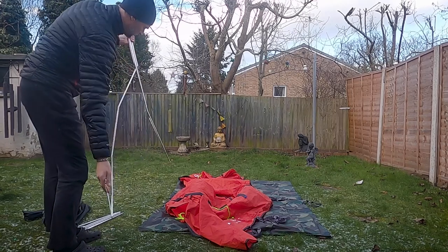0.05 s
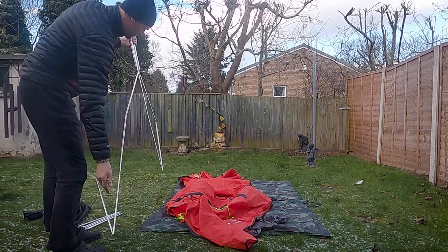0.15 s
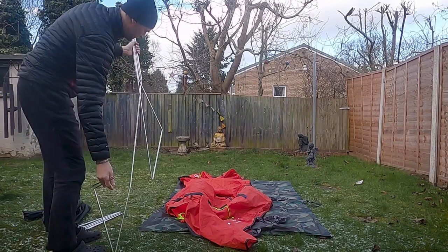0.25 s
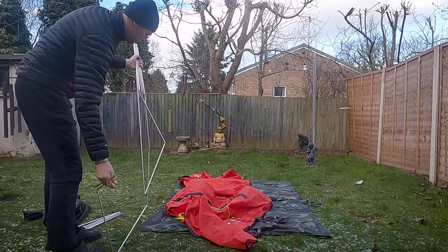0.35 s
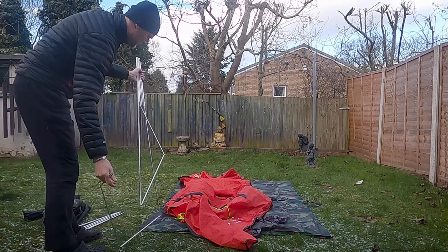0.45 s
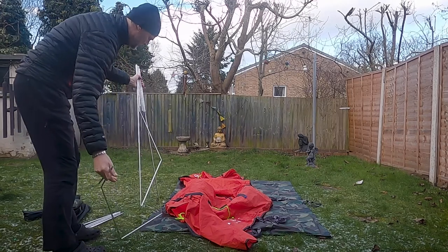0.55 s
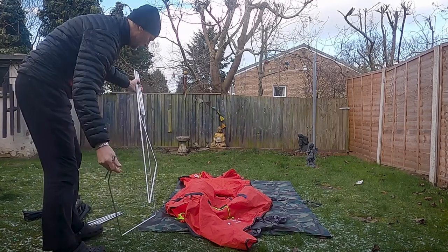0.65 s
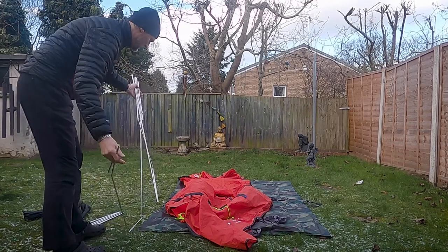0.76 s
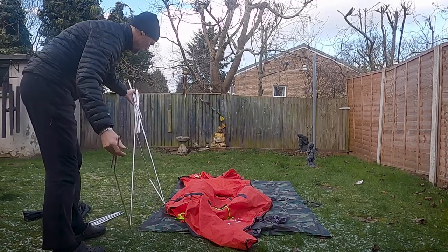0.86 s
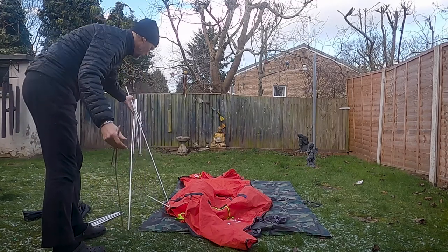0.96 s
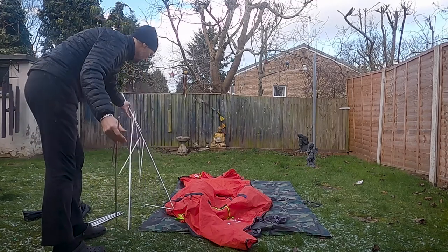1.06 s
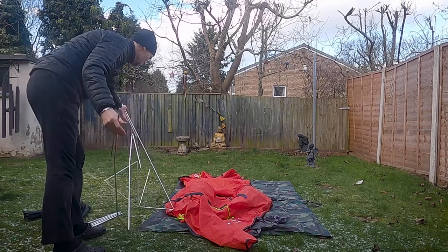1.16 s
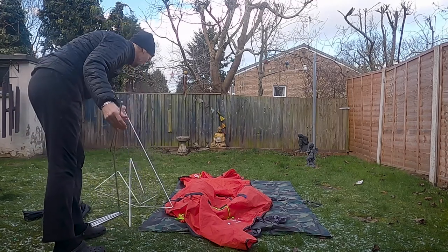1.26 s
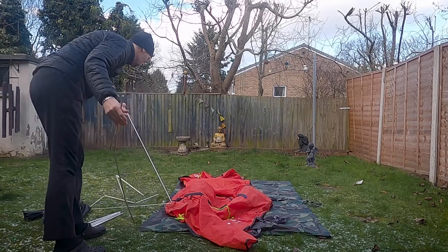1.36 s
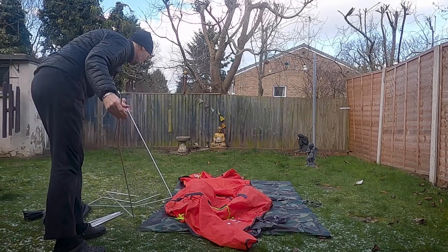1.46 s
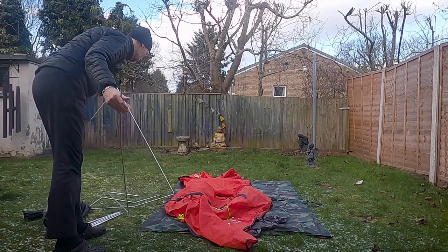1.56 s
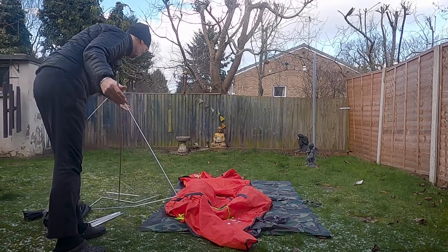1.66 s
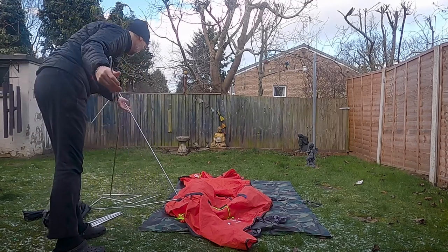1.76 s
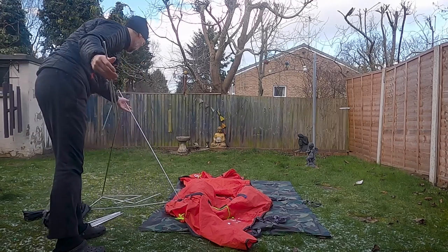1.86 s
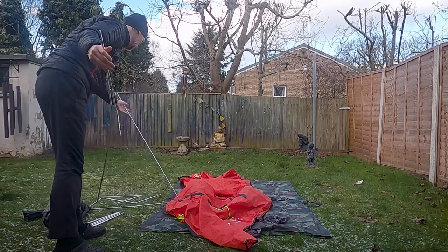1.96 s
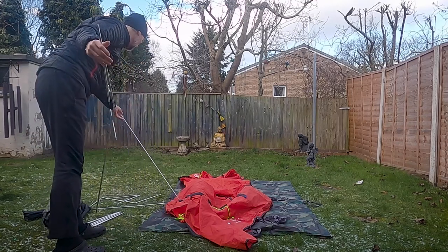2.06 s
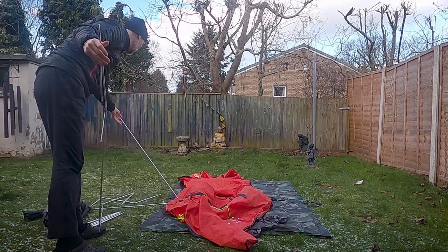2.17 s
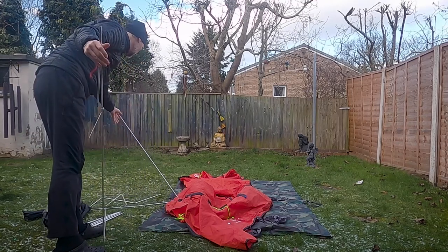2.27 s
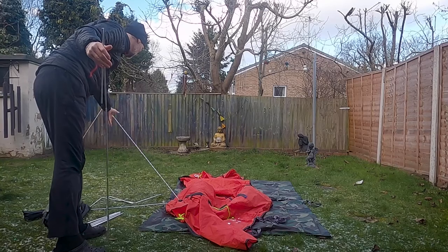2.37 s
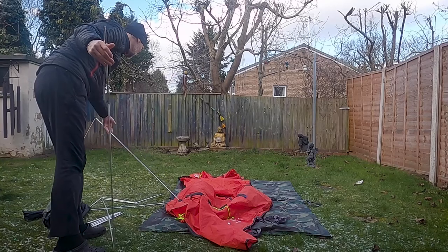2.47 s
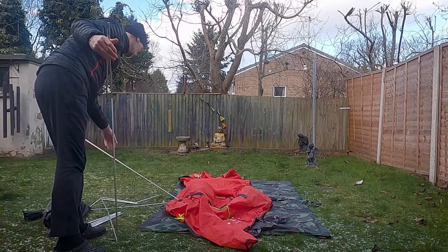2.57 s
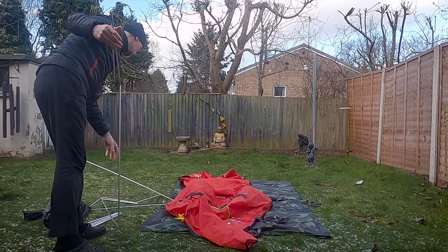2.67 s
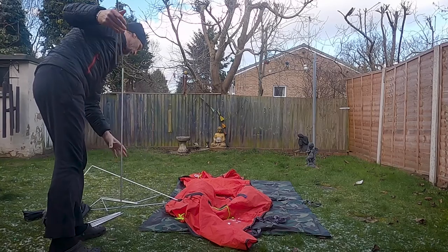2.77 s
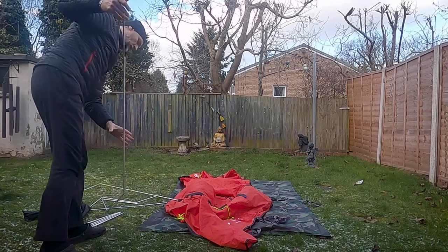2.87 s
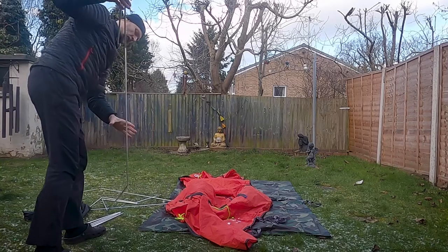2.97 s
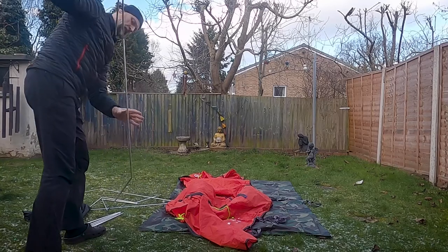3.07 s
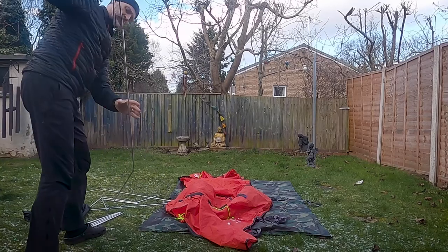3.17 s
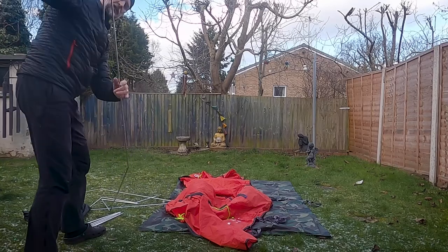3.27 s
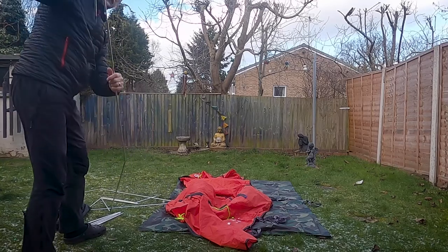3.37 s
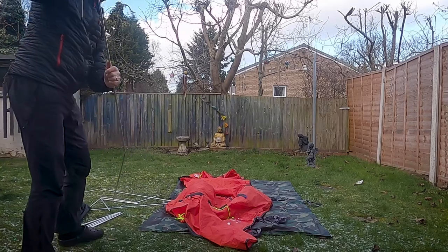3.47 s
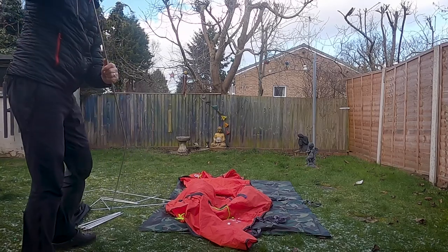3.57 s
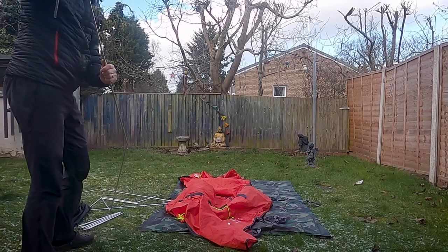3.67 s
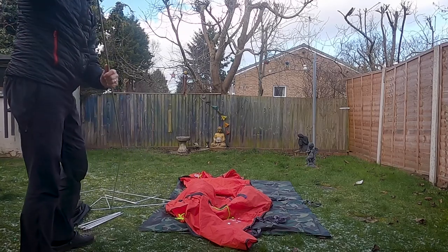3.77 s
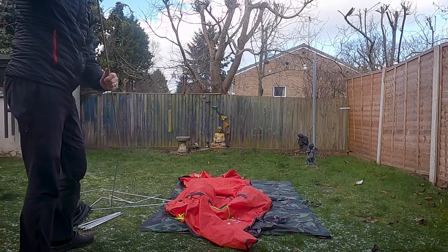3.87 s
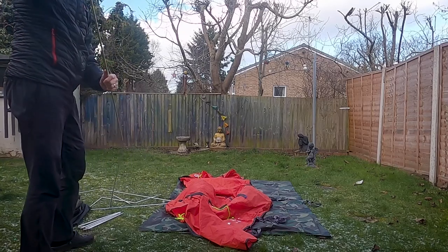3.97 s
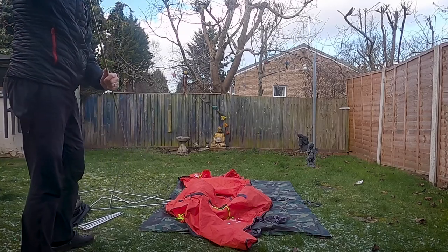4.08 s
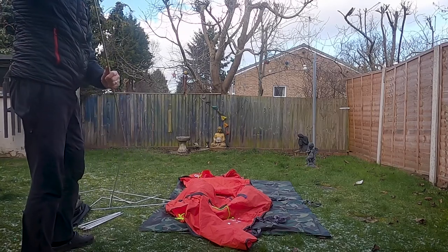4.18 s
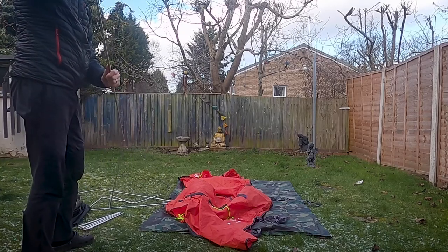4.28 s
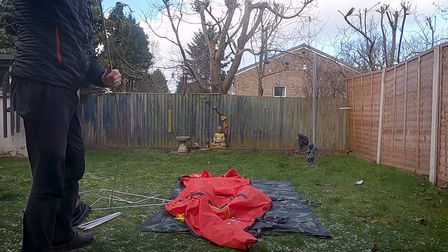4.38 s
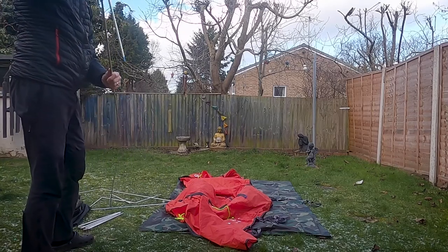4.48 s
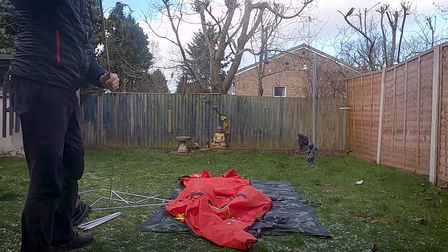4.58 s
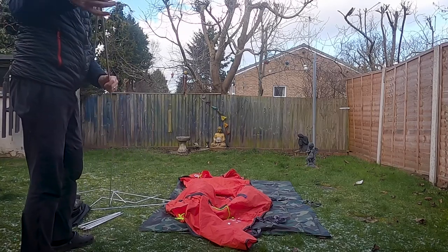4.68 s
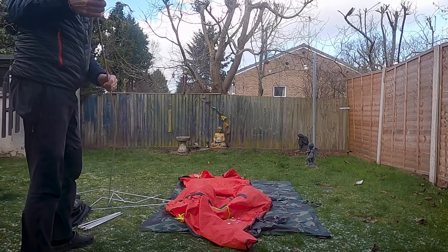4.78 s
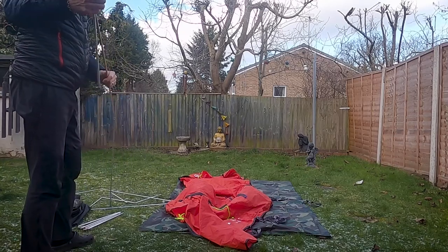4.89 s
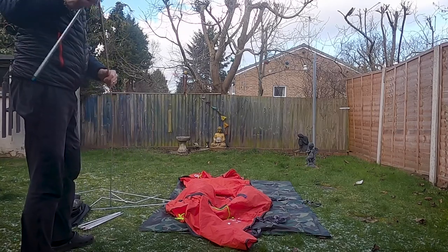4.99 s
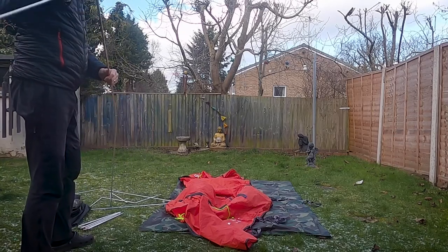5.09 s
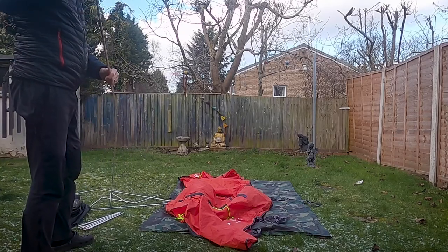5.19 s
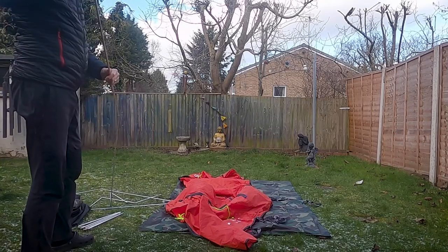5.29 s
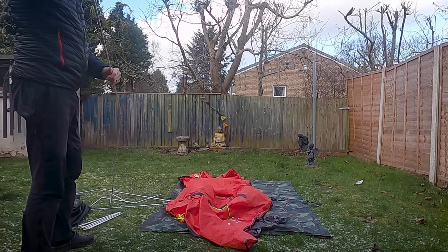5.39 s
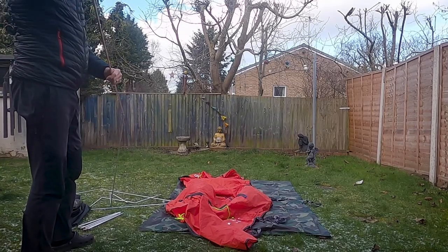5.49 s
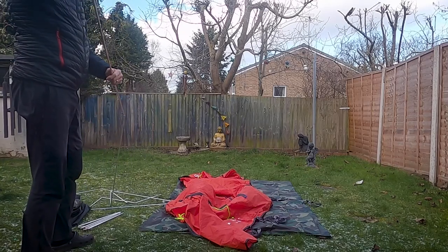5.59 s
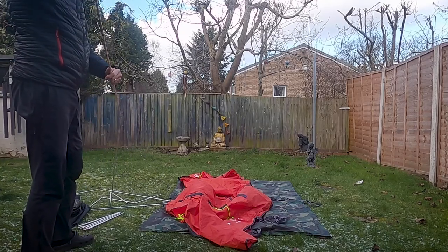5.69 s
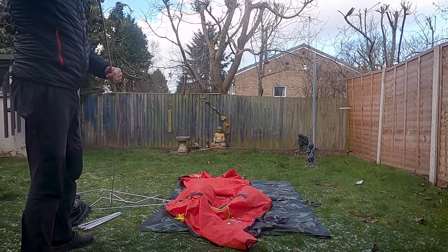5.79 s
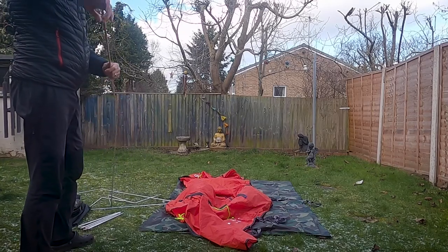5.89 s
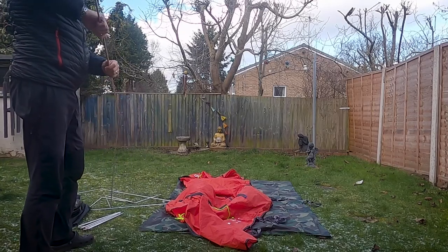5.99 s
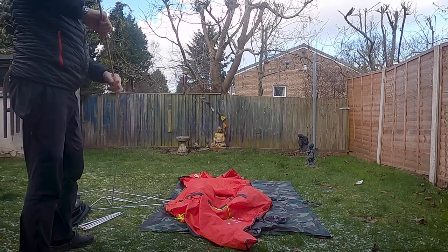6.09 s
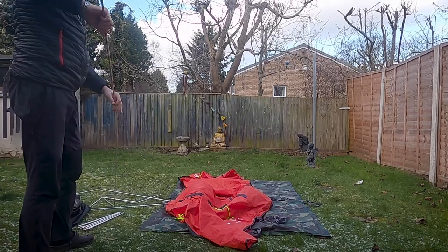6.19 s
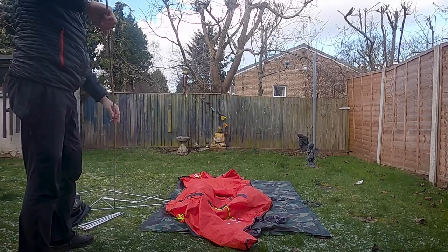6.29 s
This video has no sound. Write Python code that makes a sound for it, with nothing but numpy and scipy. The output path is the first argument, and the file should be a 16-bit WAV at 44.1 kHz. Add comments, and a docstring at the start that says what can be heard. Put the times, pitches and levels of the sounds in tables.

```python
"""In a quiet, fenced garden, a folded aluminium tent pole is shaken out on the lawn.
Its sections clack, slide and rattle: impacts and friction excite the resonances of a tube.
The elastic cord draws the ferrules home with a scrape and a snap; rough narrow tones sing between.
A nylon jacket swishes with every reach as dense coloured grains over dull flapping noise.
Boots and pole ends thud on the turf as decaying booms and noise with a crunch of grass."""
import sys
import numpy as np
from scipy import signal
from scipy.fft import rfft, irfft
from scipy.io import wavfile
from scipy.ndimage import uniform_filter1d

SR = 44100
rng = np.random.default_rng(int(sys.argv[2]) if len(sys.argv) > 2 else 0)


def wav_record(signal):
    """Record a signal, one row per channel, as 16-bit PCM in the file named by sys.argv[1]."""
    frames = np.transpose(np.atleast_2d(signal))
    bounded = np.clip(frames, -1, 1)
    # unit amplitude maps onto the largest positive 16-bit level
    quanta = np.round(bounded * 32767).astype(np.int16)
    wavfile.write(sys.argv[1], SR, quanta)


N = 279814
TIME = np.arange(N) / SR

# Still air of the garden, relative spectrum: frequency_hz, density_db_per_hz
AIR_SPECTRUM = [(18, -49), (30, -20.5), (68, 0.5), (138, -2), (259, -11.5), (512, -9.5), (962, -12.5),
                (2610, -15), (11100, -27), (12600, -40.5), (16000, -47)]
# House wall and fences: delay_s, level_db (relative to the low-passed direct sound)
WALL_ECHOES = [(.0075, -20.5), (.019, -23), (.033, -24.5), (.058, -34.5)]
# Arm movements: start_s, attack_s, end_s, swish_db (relative),
# hiss_db and flap_db (both relative to swish_db)
ARM_STROKES = [(-0.1, .08, 0.0, -56, -4, -4), (0.225, .11, 0.35, -46, -4, -6),
               (0.48, .07, 0.598, -48, -19, -7), (0.569, .08, 0.82, -39, -14, -12.5),
               (0.78, .08, 1.1, -38, -12, -7), (1.09, .08, 1.46, -42, -13, 0),
               (1.443, .05, 1.62, -49, -11, -10), (1.59, .06, 2.03, -43, -9, -8),
               (2.0, .07, 2.24, -43, -10, -16), (2.22, .04, 2.49, -42, -7, -8),
               (2.5, .08, 2.8, -58, -4, -10), (2.64, .07, 2.74, -46, -7, -7),
               (2.78, .15, 3.0, -52, -11, -13), (2.97, .04, 3.03, -57, -15, -5),
               (3.06, .1, 3.2, -63, -19, -10), (3.17, .1, 3.3, -44.5, -16, -12),
               (3.29, .06, 3.42, -51.5, -19, -10), (3.4, .08, 3.56, -47.5, -11, -8),
               (3.596, .08, 3.71, -59, -6.5, -4), (3.733, .08, 4.062, -68.5, -8, -2),
               (3.87, .06, 3.96, -57, -7, -2), (4.13, .07, 4.86, -77.5, -9, -1),
               (4.44, .06, 4.52, -68, -13, -5), (4.6, .07, 4.678, -75, -9, 0),
               (4.97, .07, 5.11, -74, -8, 9), (5.32, .06, 5.46, -81, -6.5, 4),
               (5.65, .06, 5.71, -64, -4, 3), (5.88, .11, 6.0, -53.5, -14, -8),
               (6.005, .07, 6.07, -37.5, -9.5, -9), (6.061, .08, 6.254, -42.5, -7, -6),
               (6.21, .11, 6.34, -36, -5, -7)]
# Relative spectra of the cloth: frequency_hz, density_db_per_hz
SWISH_SPECTRUM = [(250, -16), (350, -12), (460, -4), (620, -6.5), (820, -7), (1200, -5), (1700, 0.5),
                  (2200, -.5), (2800, -7), (4300, -15), (6000, -23), (10000, -38.5), (16000, -53.5)]
HISS_SPECTRUM = [(1500, -13), (3000, 1), (5000, 2), (6200, -3.5), (8600, -1.5), (11000, -8), (13000, -18),
                 (16000, -25.5)]
FLAP_SPECTRUM = [(25, -32), (55, -30.5), (90, -6), (130, -2.5), (180, -3.5), (300, -10), (600, -11.5),
                 (2000, -42)]
# Boots and pole ends land on the turf: start_s, thud_db (relative), crunch_db (relative), t60_s, boom_hz
TURF_THUDS = [(0.289, -43, -69, 0.3, 85), (0.64, -41, -56, 0.18, 149), (1.176, -45, -39, 0.5, 155),
              (1.311, -35, -23.5, .07, 263), (1.412, -36, -48, 0.24, 88), (1.967, -42, -39.5, .12, 169),
              (2.25, -47.5, -39, 0.14, 527), (2.704, -31, -22.5, 0.08, 145),
              (2.766, -38.5, -39, 0.052, 302), (2.817, -42.5, -42, 0.038, 247), (2.96, -36, -24, 0.04, 269),
              (2.9636, -22.5, -24, 0.06, 220), (3.249, -44, -68, 0.53, 162.7), (3.51, -43, -62, 0.2, 156),
              (3.554, -30.5, -48, 0.099, 118), (4.025, -51, -63, 0.29, 80.6), (5.069, -53, -66, 0.08, 125),
              (5.376, -53, -68, 0.14, 75)]
# Relative spectra of earth and crushed grass: frequency_hz, density_db_per_hz
EARTH_SPECTRUM = [(25, -28.5), (60, -19.5), (100, 6.5), (170, 9), (260, -7.5), (400, -18.5), (800, -16.5),
                  (2000, -47.5)]
GRASS_SPECTRUM = [(150, -4.5), (400, -1), (1100, -3), (2000, -5), (3200, -10), (5000, -21), (9000, -22.5),
                  (16000, -45)]
# Resonances of a pole section: frequency_hz, width_hz, level_db (relative)
TUBE_MODES = [(2270, 260, 0), (2644, 210, 4), (3250, 510, 0), (3940, 360, 0), (4450, 320, 0.5),
              (5130, 480, 1), (5850, 1400, -3), (7000, 1300, -0.5), (8675, 1100, -2.5), (9270, 980, -3),
              (10350, 2000, -5.5), (11700, 1200, -12), (15100, 700, -22)]
# Narrow tones, steady from the ringing pole or gliding from rubbed cord or cloth:
# start_s, end_s, first_hz, last_hz, level_db (relative)
SINGING_TONES = [(0.565, 0.758, 1265, 1275, -44.5), (0.592, 0.647, 3220, 3020, -37),
                 (.6, 0.82, 2300, 1980, -41), (0.922, 1.115, 1900, 1600, -40.5),
                 (1.13, 1.243, 1980, 1660, -41), (1.244, 1.465, 1264, 1264, -48),
                 (1.54, 1.66, 1474, 1434, -50), (2.044, 2.137, 1290, 1335, -41),
                 (2.079, 2.24, 1760, 1690, -47), (2.231, 2.448, 1850, 1502, -41),
                 (2.301, 2.437, 2150, 1850, -44.5), (4.46, 4.56, 1748, 1750, -67)]
# Tube slides along tube: start_s, end_s, level_db (relative), brightness_db_per_octave, ring_hz
TUBE_SLIDES = [(0.266, 0.292, -30, -9, 2550), (0.297, 0.32, -33, -8, 2770), (0.326, 0.358, -29.5, -6, 2700),
               (0.605, 0.681, -33.5, 5, 3150), (0.811, 0.886, -38.5, -7, 2300),
               (0.896, 0.962, -38, 1, 2240), (1.059, 1.104, -35.5, 5.5, 3080),
               (1.192, 1.248, -32.5, 3.5, 3530), (1.647, 1.694, -35.5, 1, 3500),
               (1.806, 1.898, -40, 0, 7960), (1.967, 2.019, -34, 0, 8950), (2.052, 2.19, -41.5, -3, 2180),
               (2.252, 2.34, -40.5, 3, 8400), (2.335, 2.5, -38.5, 0, 8400), (3.432, 3.49, -46, 0, 6340),
               (3.489, 3.523, -40, 2, 8400), (3.632, 3.643, -53, 5, 9400), (3.904, 3.977, -47, 2, 8400),
               (5.66, 5.7, -52, 2, 2550), (5.7, 5.722, -48, -6, 2550)]
# Loose tube strikes tube: start_s, level_db (relative), brightness_db_per_octave, ring_hz
TUBE_CLACKS = [(0.0816, -58.5, -6.5, 2220), (0.2466, -27, -10, 2480), (0.4588, -36.5, -14, 2700),
               (0.476, -43, -13, 2820), (0.609, -29, -8, 3040), (0.6912, -26, 0, 7000),
               (0.6995, -31.5, 1, 2630), (0.819, -31, -4, 4080), (0.8921, -28, -9, 6940),
               (0.9015, -31, -12, 7350), (0.9298, -28, 8, 3630), (1.0144, -31, -10, 5270),
               (1.0616, -26.5, 3, 8770), (1.076, -24, 2, 2850), (1.183, -24, -5, 3530),
               (1.2037, -25.5, 6.5, 5080), (1.2389, -25.5, -6.5, 10000), (1.3094, -23, -10, 2600),
               (1.3252, -22.5, 7, 8900), (1.3576, -35.5, 1, 3900), (1.4102, -20.5, -8, 7620),
               (1.496, -24.5, -2.5, 10600), (1.814, -34, 0, 7960), (1.9665, -28, 4, 4650),
               (1.9786, -26.5, -10, 8540), (2.0469, -30, 2, 6900), (2.2502, -30.5, -1, 8400),
               (2.2614, -33, 2, 2280), (2.4115, -32, 1, 7500), (2.4221, -29, 8, 8220),
               (2.4883, -25, 2.5, 9350), (2.8176, -40, 6, 7000), (3.318, -48, -8, 3190),
               (3.4355, -37, 9, 5460), (3.689, -40.5, 14, 8560), (3.8992, -42, 6, 2900),
               (5.1327, -52.5, -16, 2800)]
# Cord draws a ferrule home: snap_s, level_db (relative), brightness_db_per_octave, ring_hz, draw_s
FERRULE_JOINTS = [(0.2364, -28.5, -12, 5330, .018), (0.3217, -21.5, 0, 9750, .012),
                  (0.3829, -20.5, -16, 2740, .007), (0.6347, -24, -27, 3180, .002),
                  (1.232, -20, 4, 9850, .009), (1.3128, -20.5, -3, 3700, .007),
                  (1.4886, -19, -4, 8600, .024), (1.6443, -22.5, -1, 5500, 0.016),
                  (2.3959, -22, 4, 8670, .006), (3.952, -42, -4, 3887, 0.043),
                  (5.6813, -39, 16, 7730, .008)]


def from_db(db):
    """Decibel law: level to amplitude gain."""
    return 10 ** (np.asarray(db) / 20)


def rms(x):
    """Effective value: root of the mean square."""
    return np.sqrt(np.mean(x ** 2) + 1e-20)


def add(out, start_s, sound):
    """Superposition: mix a sound in at its start, or at zero if that is earlier."""
    at = max(round(start_s * SR), 0)
    out[at:at + len(sound)] += sound[:N - at]


def coloured(x, spectrum):
    """Linear filtering: weight the spectrum of a steady excitation; rms 1."""
    hz, db = np.transpose(spectrum)
    bins_hz = np.maximum(np.arange(len(x) // 2 + 1) * SR / len(x), 1)
    gain = from_db(np.interp(np.log(bins_hz), np.log(hz), db))
    y = irfft(rfft(x) * gain, len(x))
    return y / rms(y)


def drift(rate_hz):
    """Random modulation: straight lines join normal knots of spread 1 at the given rate."""
    knots = rng.standard_normal(4000)
    return np.interp(TIME * rate_hz, np.arange(len(knots)), knots)


def grains(size, per_s, spread_db):
    """Shot noise: tiny contacts at random moments, a few stronger as the spread grows; rms 1."""
    born = rng.random(size) < per_s / SR
    strength_db = spread_db * np.minimum(rng.exponential(1, size), 4)
    x = born * rng.standard_normal(size) * from_db(strength_db)
    return x / rms(x)


def resonance(x, hz, width_hz):
    """Damped oscillator: a two-pole resonance with gain 1 at its peak."""
    radius = np.exp(-np.pi * width_hz / SR)
    angle = 2 * np.pi * hz / SR
    numerator = np.array([1, 0, -1]) * (1 - radius * radius) / 2
    return signal.lfilter(numerator, [1, -2 * radius * np.cos(angle), radius * radius], x)


def still_air(level_db=-74):
    """Stationary noise: the quiet, coloured background of the garden air."""
    return from_db(level_db) * coloured(rng.standard_normal(N), AIR_SPECTRUM)


def garden(x, wall_cut_hz=5000, scatter_db=-19.5, scatter_t60_s=.3):
    """Reflection and scattering: a few dull echoes and a faint short tail from boards and shrubs."""
    dull = signal.sosfilt(signal.butter(1, wall_cut_hz, fs=SR, output="sos"), x)
    out = x.copy()
    for delay_s, db in WALL_ECHOES:
        add(out, delay_s, from_db(db) * dull)
    t = TIME[:SR // 2]
    tail = rng.standard_normal(len(t)) * from_db(-60 * t / scatter_t60_s)
    return out + from_db(scatter_db) * signal.fftconvolve(dull, tail / np.linalg.norm(tail))[:N]


def thuds(thud_db=-6.5, boom_db=0.0, crunch_db=0.0, rise_s=0.00073):
    """Damped impact: soft earth booms briefly under the weight while the grass crushes in grains."""
    weight, crush, boom = np.zeros(N), np.zeros(N), np.zeros(N)
    t = TIME[:SR // 3]
    for start_s, low_db, grass_db, t60_s, boom_hz in TURF_THUDS:
        push = np.minimum(t / rise_s, 1) * from_db(-60 * t / t60_s)
        add(weight, start_s, from_db(low_db + thud_db) * push)
        add(boom, start_s, from_db(low_db + boom_db) * push * np.sin(2 * np.pi * boom_hz * t))
        add(crush, start_s, from_db(grass_db + crunch_db) * push)
    earth = coloured(rng.standard_normal(N), EARTH_SPECTRUM)
    grass = coloured(grains(N, per_s=9700, spread_db=3.5), GRASS_SPECTRUM)
    return boom + weight * earth + crush * grass


def stroke(start_s, attack_s, end_s, release_t60_s=.24):
    """Motion envelope: an arm gathers speed, keeps it and comes to rest."""
    attack = np.sin(np.pi / 2 * np.clip((TIME - start_s) / attack_s, 0, 1)) ** 2
    return attack * from_db(-60 * np.clip(TIME - end_s, 0, 1) / release_t60_s)


def jacket(swish_db=1.5, hiss_db=0.0, flap_db=0.5, catch_db=2.6, crinkle_db=3.5):
    """Cloth friction: nylon weave swishes densely, creases hiss crisply and the padding flaps dully."""
    power = np.zeros((3, N))
    for start_s, attack_s, end_s, db, crisp_db, padding_db in ARM_STROKES:
        levels_db = [db, db + crisp_db, db + padding_db]
        power += np.outer(from_db(levels_db), stroke(start_s, attack_s, end_s)) ** 2
    rub, crisp, padding = np.sqrt(power)   # overlapping strokes add in power
    catching = from_db(catch_db * drift(70))
    crinkling = from_db(hiss_db + crinkle_db * drift(160))
    swish = from_db(swish_db) * rub * coloured(grains(N, per_s=14000, spread_db=2.0), SWISH_SPECTRUM)
    hiss = crinkling * crisp * coloured(grains(N, per_s=6100, spread_db=2.5), HISS_SPECTRUM)
    flap = from_db(flap_db) * padding * coloured(rng.standard_normal(N), FLAP_SPECTRUM)
    return catching * (swish + hiss + flap)


def sings(level_db=0.0, base_width_hz=27, width_per_glide=.22):
    """Phase jitter: narrow tones, steady ones rung by the pole, gliding ones by rubbed cord or cloth."""
    out = np.zeros(N)
    for start_s, end_s, first_hz, last_hz, db in SINGING_TONES:
        # a steady tone is clear; the wider its glide, the rougher
        width_hz = base_width_hz + width_per_glide * abs(last_hz - first_hz)
        size = max(round((end_s - start_s) * SR), 100)
        jitter = np.sqrt(2 * np.pi * width_hz / SR) * rng.standard_normal(size)
        glide = 2 * np.pi * np.linspace(first_hz, last_hz, size) / SR
        phase = np.cumsum(glide + uniform_filter1d(jitter, size=40))
        swell = signal.get_window(("tukey", .5), size)
        add(out, start_s, from_db(db + level_db) * np.sqrt(2) * swell * np.sin(phase))
    return out * from_db(2 * drift(150))


def tube(force, brightness_db, ring_hz, ring_share, ring_q=20, scatter_db=3.0,
         knee_octaves=0.63, direct=0.042):
    """Modal excitation: force rings a section, each contact reweighting the modes and favouring one."""
    band = signal.butter(4, [2100, 11500], "band", fs=SR, output="sos")
    out = direct * signal.sosfilt(band, force)   # bare crack of the contact
    for k, (hz, width_hz, db) in enumerate(TUBE_MODES):
        length = rng.normal(1, .025)   # relative; shifts this mode
        luck = rng.standard_normal()
        # the brightness slope levels off beyond the knee on either side of 6 kHz
        hardness_db = brightness_db * np.clip(np.log2(hz / 6000), -knee_octaves, knee_octaves)
        gain = from_db(db + hardness_db + scatter_db * luck)
        out = out + (-1) ** k * gain * resonance(force, hz / length, width_hz)
    ring = resonance(force, ring_hz, ring_hz / ring_q)
    return out / rms(out) + ring_share * ring / rms(ring)


def rattle(start_s=0.62, end_s=2.5, level_db=-52.0, per_s=55, t60_s=.018):
    """Random impacts: loose sections tick and buzz together while the bundle falls open."""
    falling = (TIME > start_s) & (TIME < end_s)
    touches = (rng.random(N) < per_s / SR) * rng.uniform(.3, 1, N) * falling
    t = TIME[:SR // 25]
    buzz = grains(len(t), per_s=9000, spread_db=0.0) * from_db(-60 * t / t60_s)
    force = signal.fftconvolve(touches, buzz)[:N] + 1e-18
    sound = tube(force, brightness_db=1.5, ring_hz=3700, ring_share=0.25)
    return from_db(level_db) * sound / rms(sound[falling])


def scrape(length_s, first_db, last_db, brightness_db, ring_hz, rise_s=0.009, release_t60_s=0.032):
    """Dry friction: metal catches thousands of times a second while the pressure grows or eases."""
    t = TIME[:SR // 4]
    sound = tube(grains(len(t), per_s=7000, spread_db=0.5), brightness_db, ring_hz, ring_share=0.4)
    release_db = -60 * np.maximum(t - length_s, 0) / release_t60_s
    pressure_db = np.interp(t, [0, length_s], [first_db, last_db]) + release_db
    return from_db(pressure_db) * np.minimum(t / rise_s, 1) * sound / rms(sound)


def slides(level_db=0.0, judder_db=3.2, fade_db=5):
    """Sliding friction: sections rub along each other, juddering and losing level as they slow."""
    out = np.zeros(N)
    for start_s, end_s, db, brightness_db, ring_hz in TUBE_SLIDES:
        length_s = max(end_s - start_s, .005)
        add(out, start_s, scrape(length_s, db, db - fade_db, brightness_db, ring_hz))
    return out * from_db(level_db + judder_db * drift(260))


def strike(db, brightness_db, ring_hz, t60_s, first_blow=7.3):
    """Impulsive excitation: a hard first blow, then the loose joint buzzes out within milliseconds."""
    t = TIME[:SR // 12]
    force = grains(len(t), per_s=12000, spread_db=0.0) * from_db(-60 * t / t60_s)
    force[0] += first_blow
    sound = tube(force, brightness_db, ring_hz, ring_share=0.84)
    return from_db(db) * sound / rms(sound[t < .004])   # level set by the first 4 ms


def clacks(level_db=-1.0, t60_s=.032):
    """Collision: dangling sections swing into each other."""
    out = np.zeros(N)
    for start_s, db, brightness_db, ring_hz in TUBE_CLACKS:
        add(out, start_s, strike(db + level_db, brightness_db, ring_hz, t60_s))
    return out


def joints(level_db=-1.0, snap_t60_s=.018, draw_db=-7, swell_db=16):
    """Friction ended by impact: each ferrule scrapes ever louder into its socket and snaps home."""
    out = np.zeros(N)
    for snap_s, db, brightness_db, ring_hz, draw_s in FERRULE_JOINTS:
        last_db = db + draw_db
        add(out, snap_s - draw_s, scrape(draw_s, last_db - swell_db, last_db, brightness_db, ring_hz))
        add(out, snap_s, strike(db + level_db, brightness_db, ring_hz, snap_t60_s))
    return out


def scene():
    """Superposition of sources: pole, tones and thuds with their echoes, jacket and still air without."""
    pole = rattle() + slides() + clacks() + joints()
    return (still_air() + jacket() + garden(thuds() + sings() + pole))[None]


def record(dry, low_cut_hz=61, high_cut_hz=16000):
    """Band limitation: deep bass and the very top are absent, leaving a thin sound."""
    thin = signal.sosfilt(signal.butter(3, low_cut_hz, "high", fs=SR, output="sos"), dry)
    return signal.sosfilt(signal.ellip(10, .2, 70, high_cut_hz, fs=SR, output="sos"), thin)


dry = scene()
out = record(dry)
wav_record(out)
```